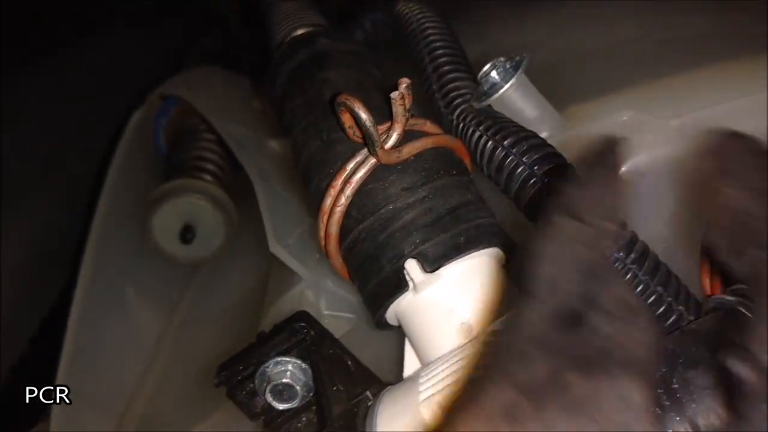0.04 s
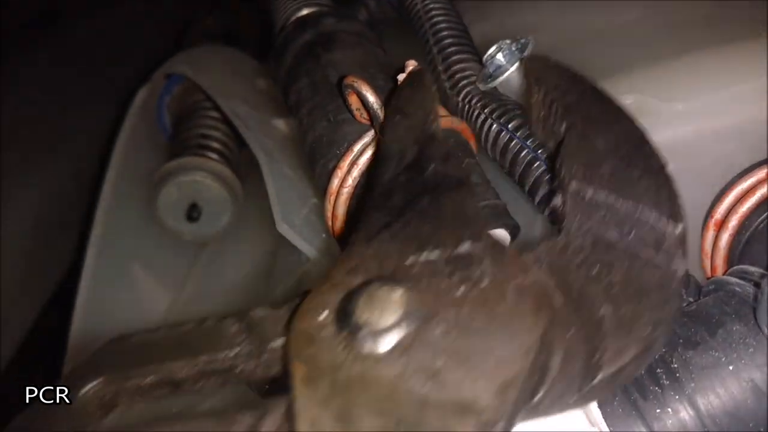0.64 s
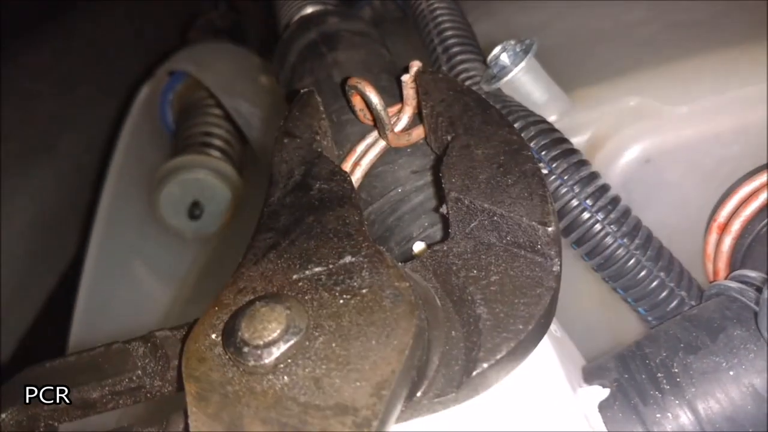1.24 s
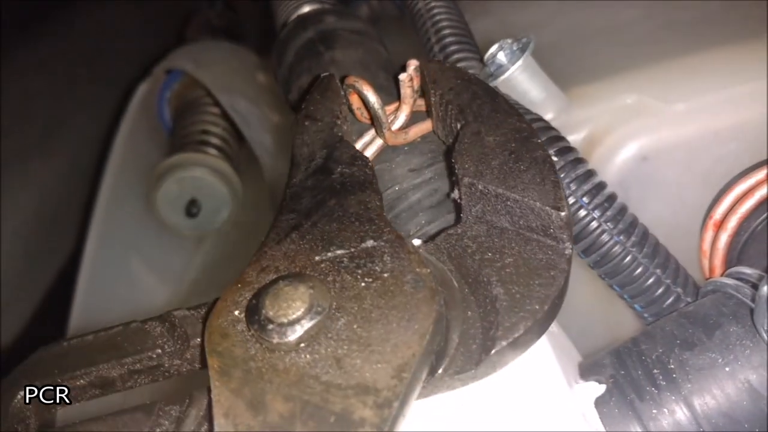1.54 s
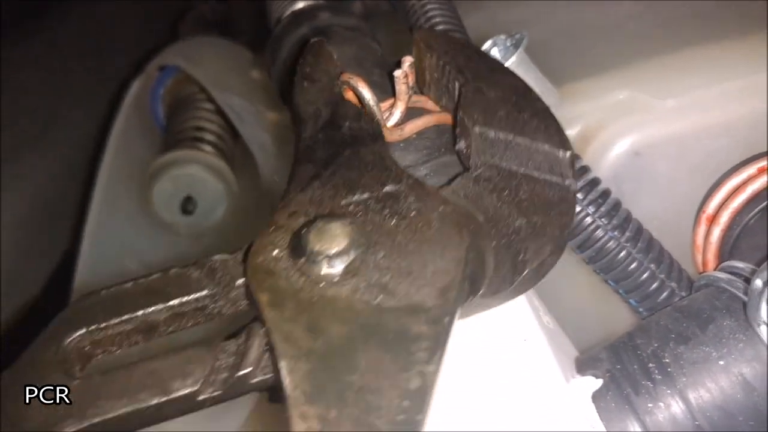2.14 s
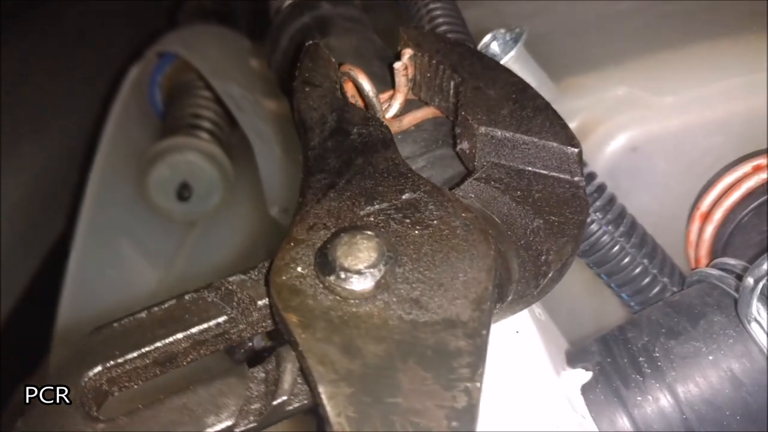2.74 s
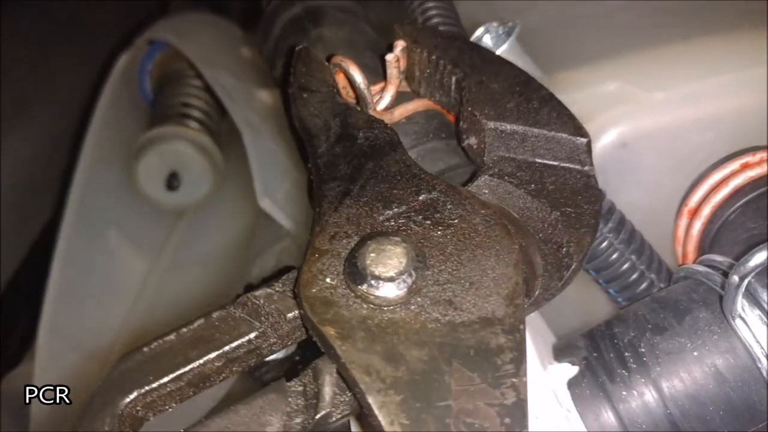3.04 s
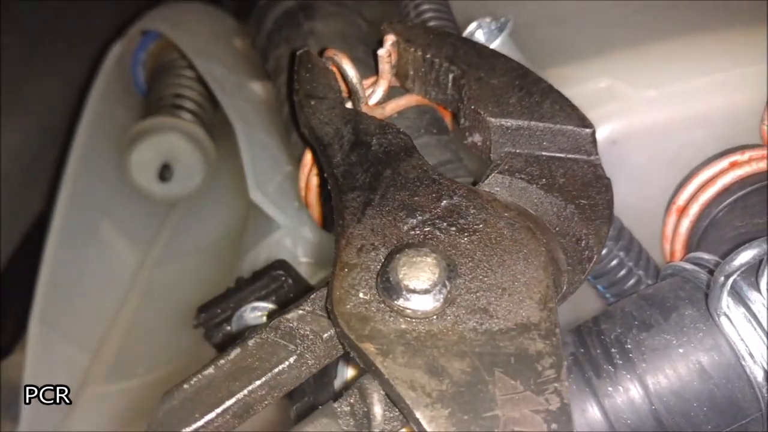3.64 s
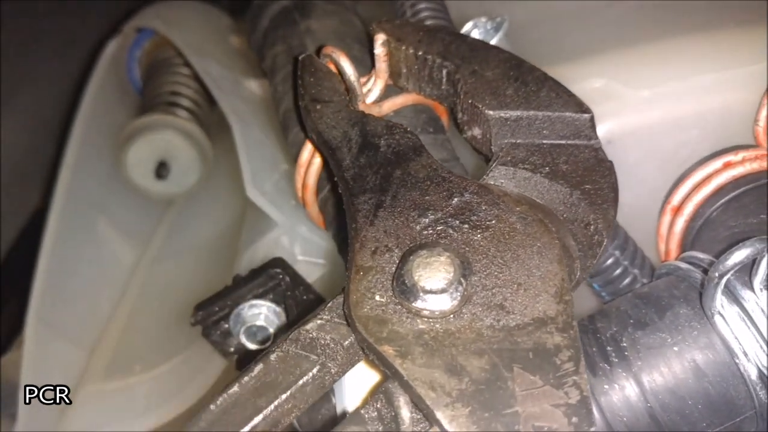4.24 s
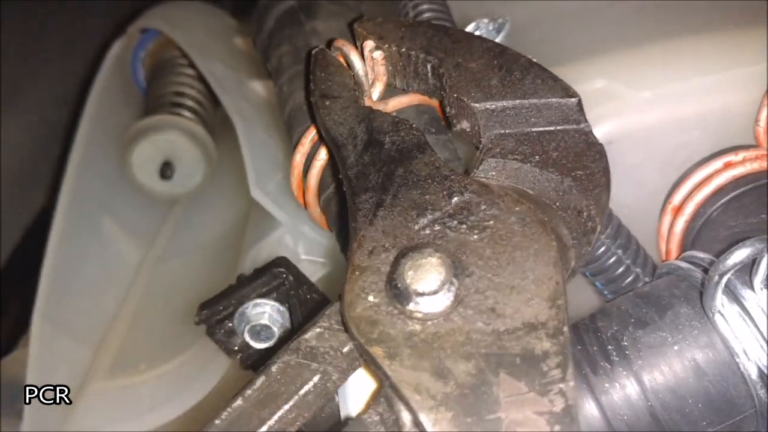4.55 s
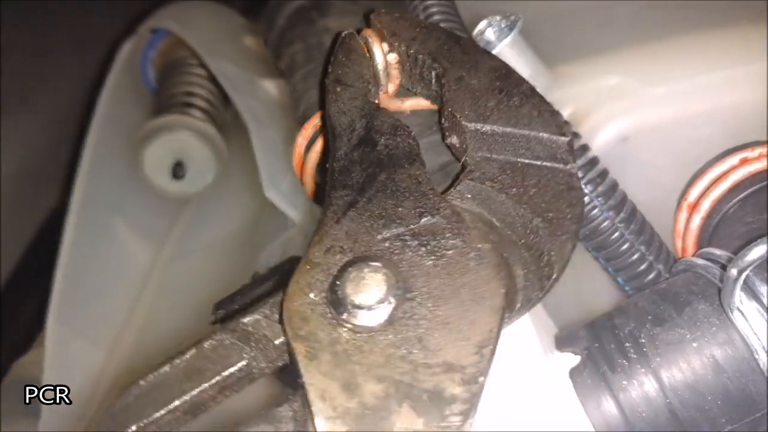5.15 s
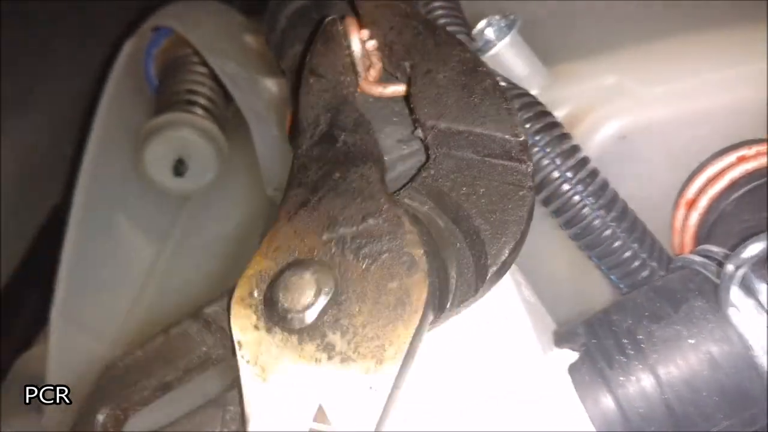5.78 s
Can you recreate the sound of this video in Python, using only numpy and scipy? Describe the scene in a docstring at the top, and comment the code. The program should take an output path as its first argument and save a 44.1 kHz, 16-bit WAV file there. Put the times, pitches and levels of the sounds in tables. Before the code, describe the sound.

Pliers click, tap and scrape against a wire clamp on a rubber hose, until the clamp snaps shut loudly.

```python
"""In the cramped space under an appliance, pliers work a wire clamp along a rubber hose on a plastic pump.
Every contact ticks in the steel, knocks in the pump housing and thumps the tub behind it. In short
strokes the jaws scrape along in tiny slips, over a faint hiss. Near the end the springy clamp snaps
shut and overloads the close microphone."""
import sys
import numpy as np
from scipy import signal
from scipy.fft import rfft, irfft, next_fast_len
from scipy.io import wavfile

SR = 44100
rng = np.random.default_rng(int(sys.argv[2]) if len(sys.argv) > 2 else 0)


def to_wav(s):
    """Save 16-bit WAV."""
    ch = np.atleast_2d(s).T  # columns
    pcm = np.round(np.clip(ch, -1, 1) * 32767)  # PCM
    wavfile.write(sys.argv[1], SR, pcm.astype(np.int16))


N = 265217
RING_TIME = np.arange(int(.45 * SR)) / SR  # seconds since a hit


def gain(db):
    """Turn decibels into a multiplier."""
    return 10 ** (np.asarray(db) / 20)


def normalise(x, size=None):
    """Scale a sound so its first size samples (or all) have an average level (rms) of 1."""
    return x / np.sqrt(np.mean(x[:size] ** 2))


def fade(decay_s):
    """A struck thing dies away, losing 60 dB in decay_s."""
    return np.exp(-np.log(1000) * RING_TIME / decay_s)


def add(track, start_s, sound):
    """Mix a sound into a track at start_s."""
    start = int(start_s * SR)
    track[start:start + len(sound)] += sound[:N - start]


def pitch_curve(points, size):
    """Join (pitch_hz, value) points into one value for each frequency of a spectrum."""
    hz, value = np.transpose(points)
    return np.interp(np.log(np.fft.rfftfreq(size, 1 / SR) + 1), np.log(hz), value)


def colour(x, points, tilt_db=0):
    """Shape the tone with (pitch_hz, level_db) points; tilt the treble by tilt_db per octave."""
    size = 2 * next_fast_len(len(x))
    octaves = np.log2(np.maximum(np.fft.rfftfreq(size, 1 / SR), 2000) / 4000)
    cepstrum = irfft(np.log(gain(pitch_curve(points, size) + tilt_db * octaves)))
    # fold the filter so that it rings only after a hit, never before
    cepstrum[1:size // 2] *= 2
    cepstrum[size // 2 + 1:] = 0
    return irfft(rfft(x, size) * np.exp(rfft(cepstrum)))[:len(x)]


def ringing_tones(table):
    """An object rings with one fading sine wave for each of its natural pitches."""
    return np.array([gain(db) * fade(decay_s) * np.sin(2 * np.pi * hz * RING_TIME)
                     for hz, db, decay_s in table])


def strike(tones, scatter_db, detune=0):
    """Each spot struck mixes the tones differently; the changing grip shifts their pitch a little."""
    ring = gain(scatter_db * rng.standard_normal(len(tones))) @ tones
    speed = 1 + detune * rng.standard_normal()
    return np.interp(RING_TIME * speed, RING_TIME, ring, right=0)


def burst(decay_s):
    """A fading rush of tiny impacts or echoes, with energy 1."""
    rush = rng.standard_normal(len(RING_TIME)) * fade(decay_s)
    return rush / np.linalg.norm(rush)


def excite(force, ring):
    """Every push of a force sets off the same ring."""
    return signal.oaconvolve(force, ring / np.linalg.norm(ring))[:N]


def hiss(flutter_db=4.0, flutter_per_s=18):
    """A faint broad hiss swells, sinks and flutters."""
    # tone of the hiss: pitch_hz, relative_db
    tone = [(30, -4.5), (80, 8), (220, 5.5), (450, 1), (1200, -7), (2000, -9.5), (4500, -12), (9000, -15.5),
            (15500, -27)]
    # its slow swells: time_s, level_db
    swells = [(0, -57), (.55, -53.5), (.8, -62.5), (1.1, -62.5), (1.8, -62.5), (2.05, -56), (2.5, -57.5),
              (2.8, -54), (3.5, -51), (3.95, -54), (4.35, -53), (4.6, -65.5), (4.72, -67.5), (4.95, -73.5),
              (5.4, -73.5), (5.72, -63.5), (5.86, -54), (6, -60.5)]
    t = np.arange(N) / SR
    flutter = np.interp(t * flutter_per_s, np.arange(400), rng.standard_normal(400))
    level_db = np.interp(t, *np.transpose(swells)) + flutter_db * flutter
    return gain(level_db) * normalise(colour(rng.standard_normal(N), tone))


def steel_tick(steel, tilt_db, clink_hz):
    """Steel cracks, echoes off close walls and rings; the spot struck favours pitches near clink_hz."""
    # tone of steel hitting steel: pitch_hz, relative_db
    tone = [(150, -21), (600, -23), (1700, -1.5), (2400, 1.5), (3400, 0.5), (4800, 1.5), (6500, -3.5),
            (9000, -6.5), (12000, -11), (15500, -19.5)]
    crack, walls, tail = burst(0.0076), gain(-1.5) * burst(0.084), gain(-22) * burst(0.23)
    tick = normalise(colour(crack + walls + tail, tone, tilt_db), size=441)
    clink = signal.lfilter(*signal.iirpeak(clink_hz, Q=1.4, fs=SR), tick)
    ring = normalise(strike(steel, scatter_db=3, detune=.002), size=441)
    return normalise(tick + gain(2) * clink, size=441) + gain(-7) * ring


def skid(blow, skid_s, clean_hit_s=.002):
    """A glancing blow spreads into a swelling, fading run of tiny slips; a brief one stays a clean hit."""
    if skid_s < clean_hit_s:
        return blow
    force = rng.standard_normal(len(RING_TIME)) * RING_TIME * np.exp(-RING_TIME / skid_s)
    scuff = signal.fftconvolve(blow, force)[:len(blow)]
    return scuff * np.linalg.norm(blow) / np.linalg.norm(scuff)


def housing_knock(housing, clack_db=-4):
    """The plastic housing rings with its main tones over a clack of many weak ones."""
    # tone of the clack: pitch_hz, relative_db
    tone = [(120, -14), (350, -6), (750, -7), (1250, 4), (1600, -8), (2400, -13), (5000, -30),
            (12000, -50)]
    clack = normalise(colour(burst(.055), tone), size=441)
    ring = normalise(strike(housing, scatter_db=4.5, detune=0.011), size=441)
    return ring + gain(clack_db) * clack


def pitch_sag(knock, lag_s=.008, below_hz=950, uneven=.7, ripple_hz=90):
    """Low waves cross the ribbed plastic later than high ones, and unevenly, so a knock sags in pitch."""
    size = 2 * next_fast_len(len(knock))
    hz = np.fft.rfftfreq(size, 1 / SR)
    ribs = np.interp(hz / ripple_hz, np.arange(100), rng.standard_normal(100))
    late_s = lag_s * np.maximum(1 + uneven * ribs, 0) / (1 + (hz / below_hz) ** 4)
    phase = 2 * np.pi * np.cumsum(late_s) * SR / size
    return irfft(rfft(knock, size) * np.exp(-1j * phase))[:len(knock)]


def tub_thump(tub, rise_s=0.0048, hose_db=-6):
    """The big tub takes a moment to start swinging; the slack hose adds a loose thud with no pitch."""
    thud = signal.sosfilt(signal.butter(2, [130, 400], "band", fs=SR, output="sos"), burst(.09))
    ring = strike(tub, scatter_db=2, detune=0.039) * (1 - np.exp(-RING_TIME / rise_s))
    thump = normalise(ring, size=1100) + gain(hose_db) * normalise(thud, size=1100)
    return normalise(thump, size=1100)


def jaw_hits(tub, housing, steel):
    """The jaws hit and slip off the clamp; each blow reaches steel and housing, then the tub."""
    # blows of the jaws: start_s, thump_db, knock_db, tick_db, tilt_db (per octave)
    blows = [(0.239, -33.5, -53, -24, -4), (0.25, -42.5, -28.5, -23.5, -3),
             (0.268, -52.5, -39.5, -29.5, -7.5), (0.328, -45, -33, -46, -1), (0.3926, -46, -42.5, -32.5, 2),
             (0.400, -55, -44, -32.5, -3.5), (0.412, -43, -44, -28.5, -7), (0.439, -30, -47, -40, -11.5),
             (0.461, -37, -31, -48.5, -2), (0.615, -22.5, -29.5, -31.5, 2), (0.655, -48.5, -39, -36.5, 1),
             (0.73, -31.5, -26.5, -29, 6.5), (0.929, -59, -47, -50, -11), (1.147, -30.5, -29, -32, 0.5),
             (1.246, -33.5, -21, -27, 0.5), (1.298, -43.5, -33.5, -48.5, -1), (1.509, -43, -43, -60, 3),
             (1.618, -43.5, -43.5, -41.5, -0.5), (1.839, -37.5, -31.5, -56, -7),
             (2.115, -41.5, -27, -23, -2.5), (2.155, -35.5, -26, -31, -1.5),
             (2.169, -26.5, -26.5, -35.5, -0.5), (2.197, -38, -34.5, -32.5, -5),
             (2.325, -37, -23.5, -32.5, -1), (2.367, -30, -32.5, -38.5, 3), (2.592, -52.5, -52, -74, -2),
             (3.235, -36.5, -57, -62, -8), (3.272, -32, -33, -44, -6), (3.744, -35, -35, -58.5, 8),
             (3.812, -53, -62, -44.5, 13), (4.088, -49, -51, -54.5, 2), (4.183, -40.5, -71, -39, 10),
             (4.37, -33.5, -24.5, -36.5, -8.5), (4.446, -36.5, -23.5, -23.5, 0.5),
             (4.509, -36.5, -32.5, -23.5, 0), (5.152, -66.5, -49, -26.5, 2.5), (5.425, -57, -56, -59.5, -1),
             (5.649, -60.5, -62, -44, -7)]
    out = np.zeros(N)
    for start_s, thump_db, knock_db, tick_db, tilt_db in blows:
        clink_hz = 3830 * 2 ** (.04 * tilt_db)  # a brighter hit clinks higher
        skid_s = .0021 * 2 ** ((-42.5 - tick_db) / 21)  # a lighter hit skids longer before it bites
        add(out, start_s + 2 * skid_s, gain(thump_db) * tub_thump(tub))
        add(out, start_s, gain(knock_db) * pitch_sag(housing_knock(housing)))
        add(out, start_s, gain(tick_db) * skid(steel_tick(steel, tilt_db, clink_hz), skid_s))
    return out


def hand_pressure(build_db_per_s=418.5, release_db_per_s=474):
    """The hand leans into each stroke, holds and lets go; gives the force on the hose and on the wire."""
    # strokes of the jaws: full_pressure_at_s, hold_s, hose_drag_db, wire_grit_db
    strokes = [(0.336, 0.18, -52, -85), (0.589, 0.0075, -30, -45.5), (0.683, 0.015, -37, -40),
               (0.753, 0.033, -45, -57), (0.892, 0.0091, -49.5, -52.5), (1.406, 0.042, -48.5, -63),
               (1.589, 0.1, -57.5, -81), (1.934, 0.01, -47.5, -66), (2.049, 0.06, -42, -60.5),
               (2.121, 0.085, -30, -37.5), (2.31, 0.071, -33.5, -45), (2.864, 0.034, -33.5, -50),
               (3.092, 0.055, -40, -53), (3.244, 0.024, -36.5, -46), (3.38, 0.55, -58, -65.5),
               (3.747, 0.0067, -42, -58), (3.812, 0.017, -57, -53.5), (4.165, 0.0069, -40.5, -52),
               (4.358, 0.0052, -29.5, -35), (4.449, 0.012, -38, -42.5), (5.446, 0.012, -63.5, -63),
               (5.615, 0.013, -54, -54), (5.769, 0.17, -63, -72.5)]
    t = np.arange(N) / SR
    drag, grit = np.zeros((2, N))
    for full_s, hold_s, drag_db, grit_db in strokes:
        pace = 2 ** ((drag_db + 41) / 30.5)  # scales both rates: firm strokes are quicker
        before_s, after_s = np.maximum(full_s - t, 0), np.maximum(t - full_s - hold_s, 0)
        drop_db = pace * (build_db_per_s * before_s + release_db_per_s * after_s)
        shape = gain(-np.minimum(drop_db, 100))
        drag = np.maximum(drag, gain(drag_db) * shape)
        grit = np.maximum(grit, gain(grit_db) * shape)
    return drag, grit


def slips(per_s, spread_db):
    """Surfaces stick, then let go in tiny jerks at random times; spread_db makes their sizes uneven."""
    jerks = gain(spread_db * np.minimum(rng.exponential(size=N), 4)) * rng.choice([-1, 1], N)
    return normalise(jerks * (rng.random(N) < per_s / SR))


def scrape(tub, housing, steel):
    """Dragged rubber shakes the tub and housing while the jaws grate on the wire."""
    drag, grit = hand_pressure()
    out = np.zeros(N)
    for layer_hz in (2500, 3300, 4600):  # three layers of slips blend into one even, gritty scrape
        rubber = drag * slips(per_s=700, spread_db=4)
        grit_layer = grit * slips(per_s=1300, spread_db=0)
        out += gain(-4) * excite(rubber, strike(tub, scatter_db=0.5))
        out += gain(-6) * excite(rubber, housing_knock(housing))
        out += gain(-6) * excite(grit_layer, steel_tick(steel, tilt_db=-0.5, clink_hz=layer_hz))
    return out


def clamp_snap():
    """The released spring gives a broad dry crack and one low jolt that dies at once."""
    # the clamp snapping shut: start_s, jolt_hz, jolt_db, crack_db
    closing = (4.7537, 115.5, -3, -14)
    # tone of its crack: pitch_hz, relative_db
    tone = [(150, 4), (500, 3.5), (1000, 4), (1800, 4), (3000, -1.5), (6500, 1.5), (10000, -2.5),
            (15500, -12)]
    start_s, jolt_hz, jolt_db, crack_db = closing
    crack, jolt = np.zeros((2, N))
    hit, walls, tail = burst(0.0047), gain(-1) * burst(0.072), gain(-19) * burst(0.22)
    add(crack, start_s, gain(crack_db) * normalise(colour(hit + walls + tail, tone), size=441))
    add(jolt, start_s, -gain(jolt_db) * fade(0.019) * np.cos(2 * np.pi * jolt_hz * RING_TIME))
    return crack, jolt


def stereo(sound, jolt, balance_db=1.4, lag_s=17 / SR, echo_db=-13):
    """The right channel is flipped and late; wall echoes and the jolt push the two in opposite ways."""
    # extra shift of the waves on the right: pitch_hz, phase_radians
    shifts = [(40, 0.39), (90, 0.82), (200, 1), (400, 0.24), (800, .6), (1300, -0.33), (1700, 0.4),
              (2400, -0.041), (2800, 0.14), (3250, 0.45), (4000, 1), (4600, 0.098)]
    size = 2 * next_fast_len(N)
    phase = pitch_curve(shifts, size) + 2 * np.pi * np.fft.rfftfreq(size, 1 / SR) * lag_s
    right = -irfft(rfft(sound, size) * np.exp(-1j * phase))[:N]
    treble = signal.sosfilt(signal.butter(2, 2200, "high", fs=SR, output="sos"), sound)
    side = gain(echo_db) * excite(treble, burst(0.031)) + jolt
    return np.array([sound * gain(balance_db / 2) + side, right * gain(-balance_db / 2) - side])


def scene():
    """Hits, scrapes and the snap over a faint hiss."""
    # the tub and its mounts: pitch_hz, relative_db, decay_s
    tub = [(77, -14.5, 0.89), (86.27, -13, 0.69), (129.4, -21.5, 0.13), (180.6, -1, 0.25), (233.9, 4, 0.19),
           (254.8, -2.5, 0.18), (323, -12.5, 0.19)]
    # the plastic pump housing, muffled by the hose: pitch_hz, relative_db, decay_s (capped below)
    housing = [(413.5, -11, 0.27), (525.5, -8.5, 0.11), (629.7, -8, 0.19), (837, -3, 0.17),
               (943.5, -3.5, 0.29), (1040, -3.5, 0.051), (1136, 5, 0.033), (1200.3, -1.5, 0.056),
               (1208, -29.5, 0.012), (1555, -29.5, 0.0091), (1930, -11, 0.02)]
    # pliers and wire, muffled by hand and hose: pitch_hz, relative_db, decay_s
    steel = [(2570, 10, 0.017), (3010, -6, 0.056), (3095, -2, 0.062), (3570, -7, 0.07), (4320, -3.5, 0.058),
             (5234, -1, .04), (5900, -14, 0.028), (6754, -5, 0.014), (7520, -23, 0.041),
             (9740, -26.5, 0.085), (13098, -30.5, .14)]
    muffled_housing = [(hz, db, min(decay_s, .1)) for hz, db, decay_s in housing]
    bodies = ringing_tones(tub), ringing_tones(muffled_housing), ringing_tones(steel)
    crack, jolt = clamp_snap()
    return stereo(jaw_hits(*bodies) + scrape(*bodies) + hiss() + crack, jolt)


def record(dry, bottom_hz=45, top_hz=15900):
    """The deepest bass is thinned, overloads are rounded off and the highest treble is cut."""
    thinned = signal.sosfilt(signal.butter(2, bottom_hz, "high", fs=SR, output="sos"), dry)
    rounded = np.tanh(thinned)
    return signal.sosfilt(signal.ellip(10, .2, 95, top_hz, fs=SR, output="sos"), rounded)


dry = scene()
out = record(dry)
to_wav(out)
```